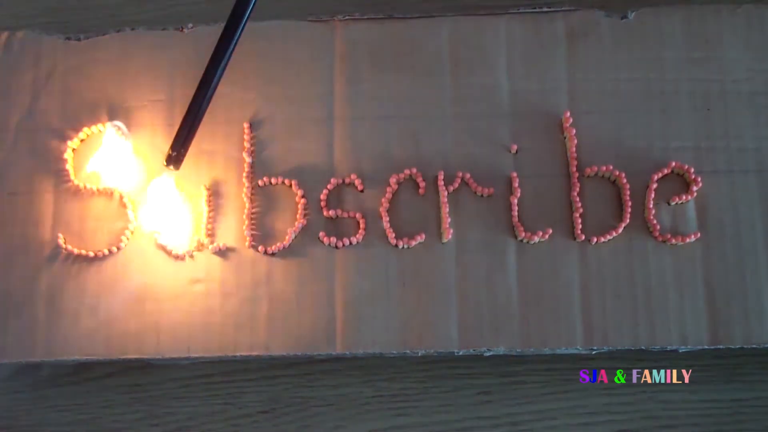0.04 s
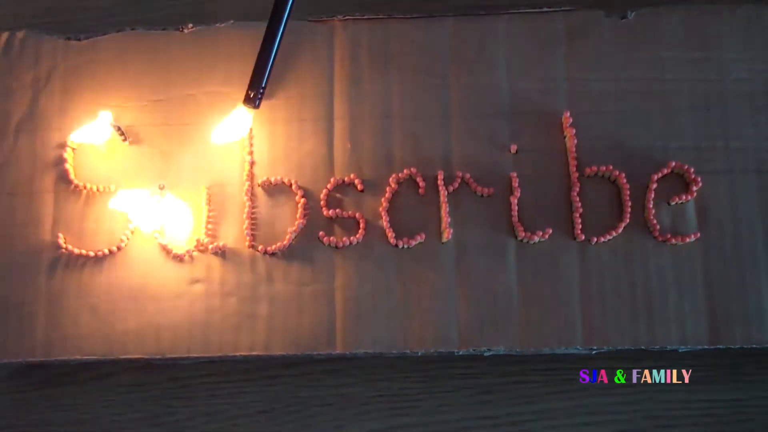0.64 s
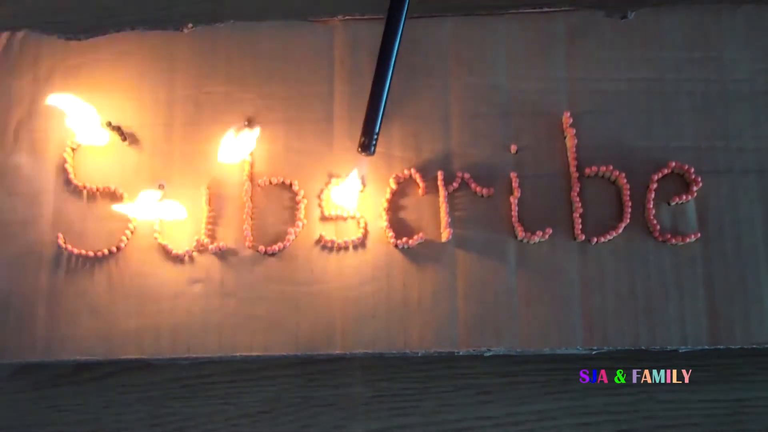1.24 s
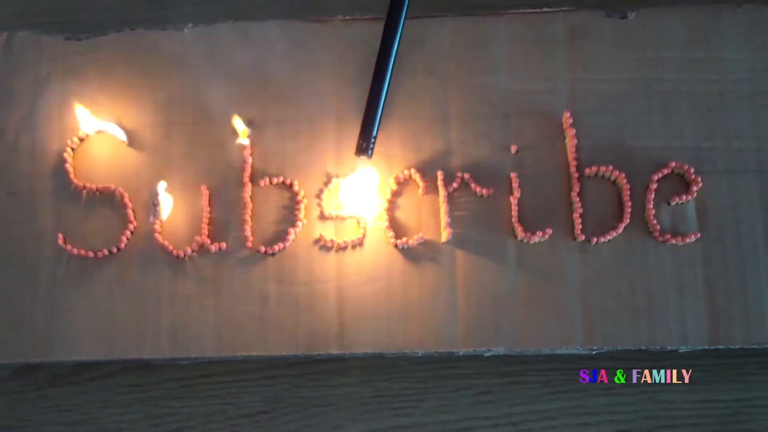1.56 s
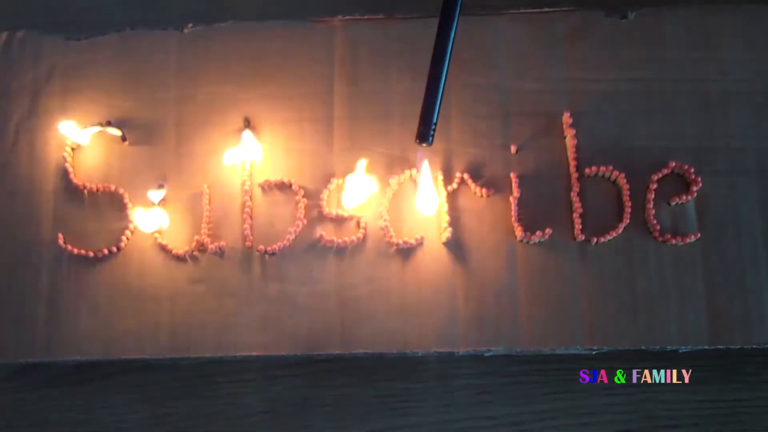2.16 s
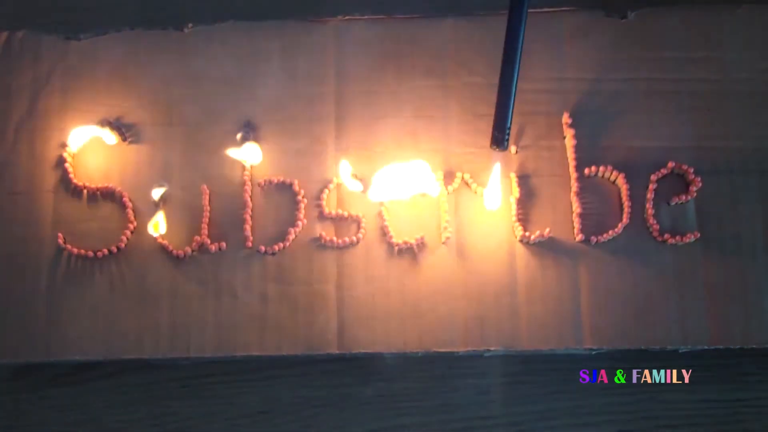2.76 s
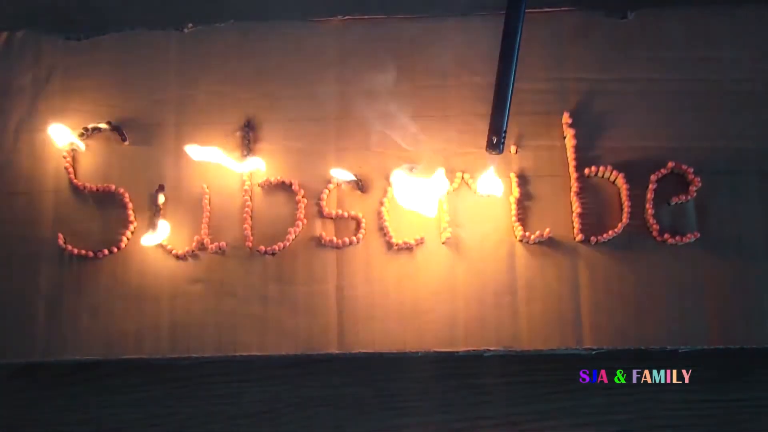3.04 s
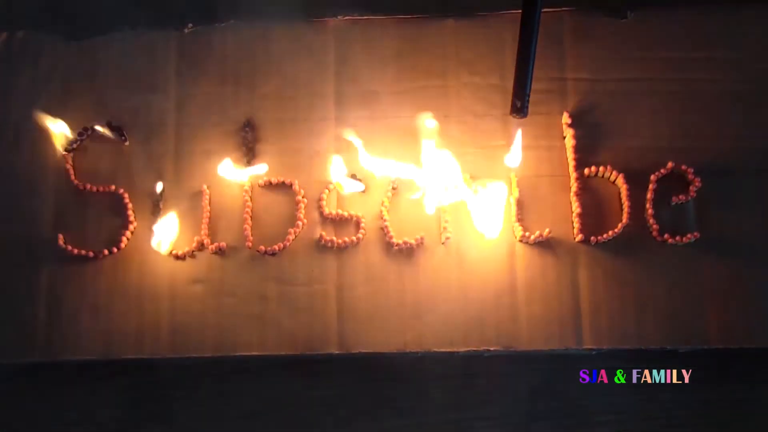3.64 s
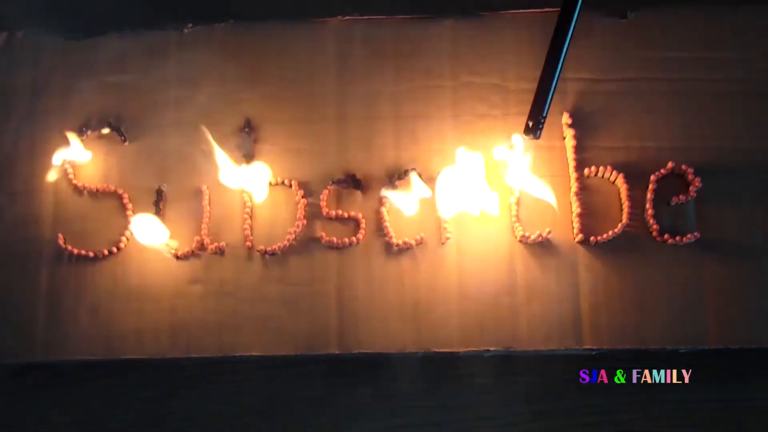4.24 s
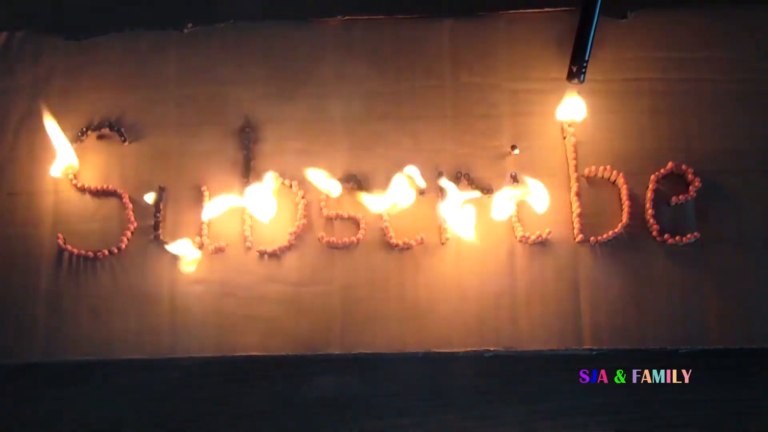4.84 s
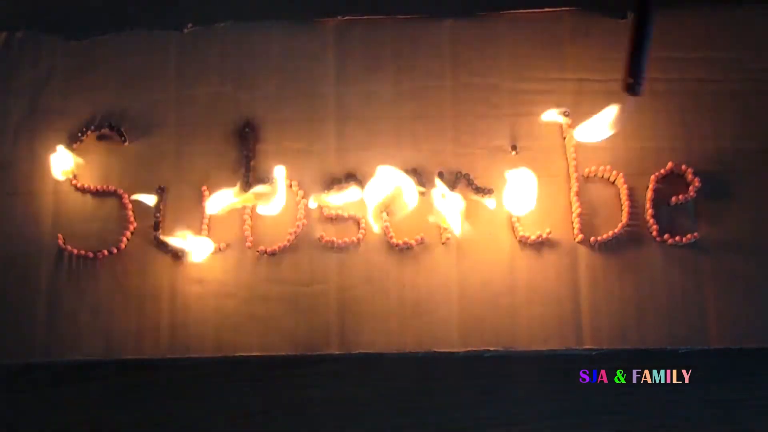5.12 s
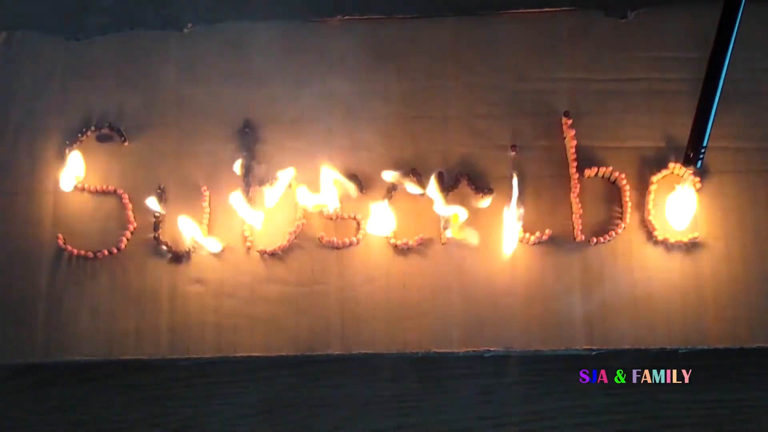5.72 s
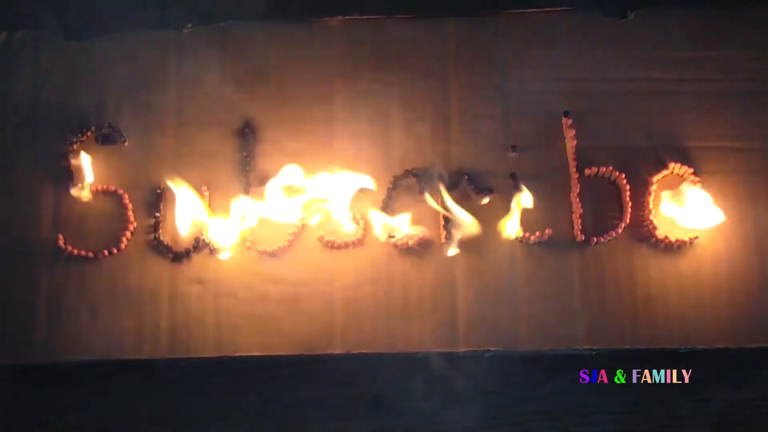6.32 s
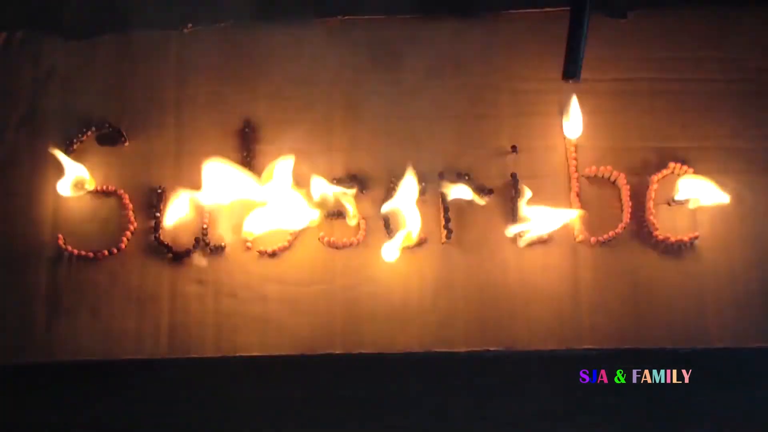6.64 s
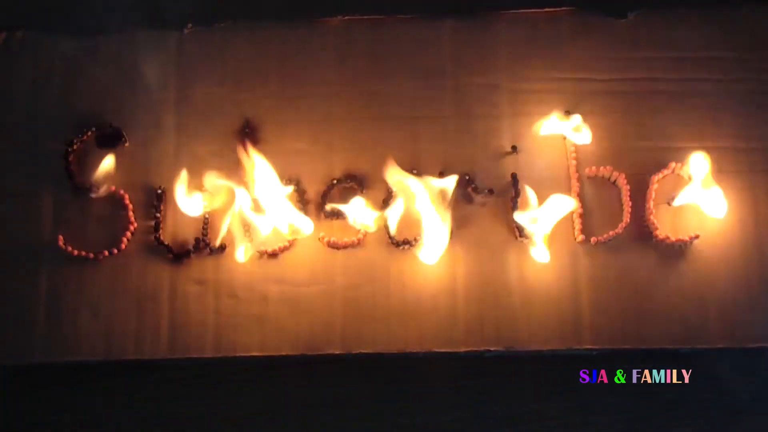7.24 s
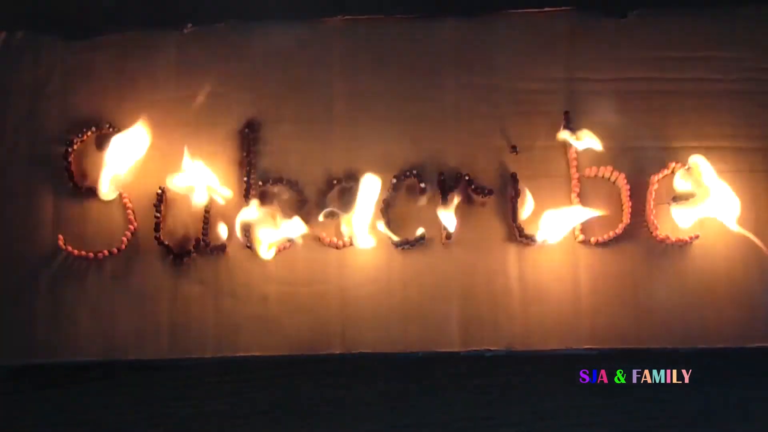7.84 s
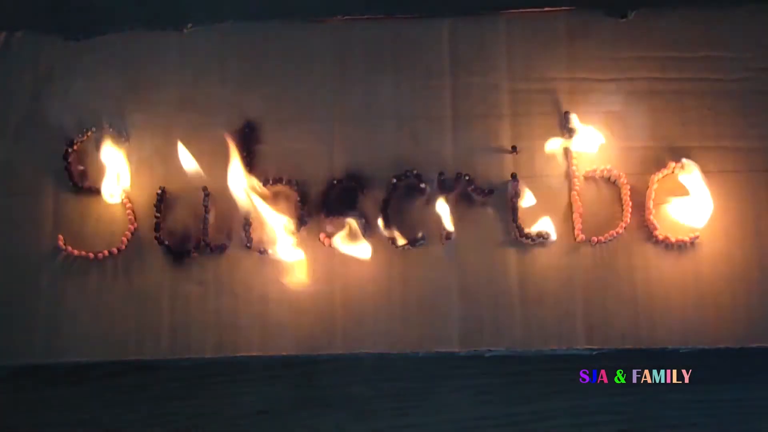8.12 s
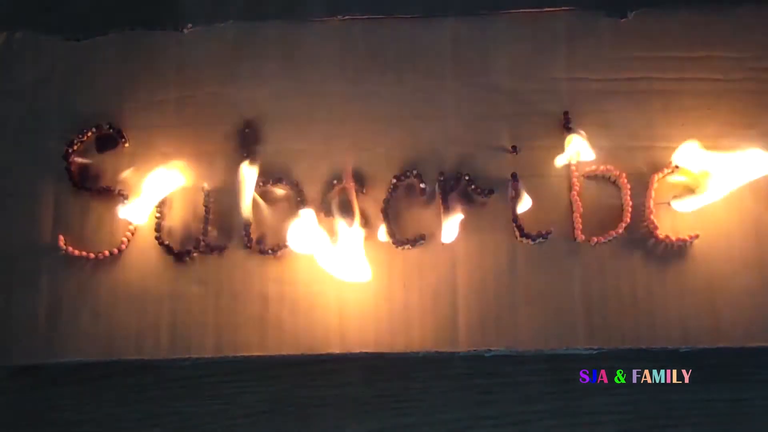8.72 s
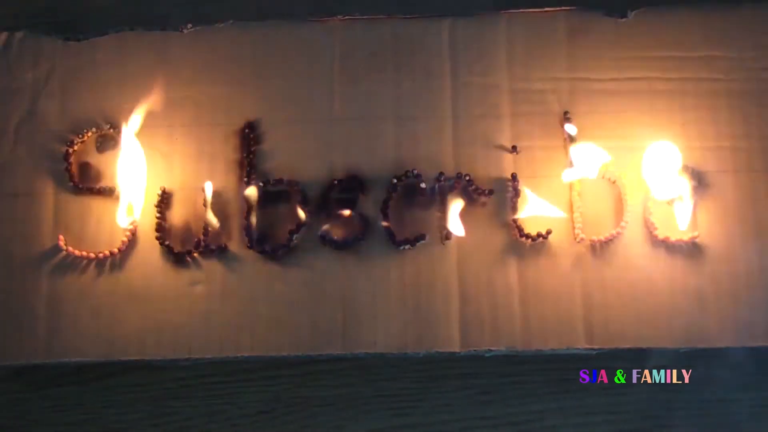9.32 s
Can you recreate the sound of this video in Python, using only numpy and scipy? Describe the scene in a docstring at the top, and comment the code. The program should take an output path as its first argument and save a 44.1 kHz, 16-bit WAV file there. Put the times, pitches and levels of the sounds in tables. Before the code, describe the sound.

Rows of matches catch one after another on cardboard, sizzling and popping close up as a soft flame roar grows.

```python
"""Burning rows of match heads

Match heads catch one after another on a cardboard sheet, heard close up in a small room.
Gas jets and bubbling melt hiss and fizz in surges. Some heads burst with a pop that rings the card,
others spit a bright snap through a split crust. The growing flames roar softly and flap in the draught."""
import sys
import numpy as np
from scipy import signal
from scipy.fft import rfft, irfft
from scipy.io import wavfile
from scipy.ndimage import map_coordinates

SR = 44100
rng = np.random.default_rng(int(sys.argv[2]) if len(sys.argv) > 2 else 0)


def master(y):
    """Save y as 16-bit WAV."""
    cut = np.clip(np.atleast_2d(y).T, -1, 1)
    pcm = np.round(cut * 32767)  # scale
    wavfile.write(sys.argv[1], SR, pcm.astype(np.int16))


N = 422037
TIME_S = np.arange(N) / SR

# Growth of the open flames. Each row: time in seconds, roar level in dB.
ROAR_CURVE = [(0, -72.5), (2.3, -71.5), (2.7, -65), (4.4, -68.5), (5.8, -69.5), (6.5, -59.5), (7.9, -64),
              (9.57, -61.5)]
# Splits in the crust. Each row: start in seconds, level in dB, whistle pitch in Hz, length in ms,
# whistle over crack in dB, top of the crack band in Hz.
CRUST_SPLITS = [(0.3647, -37, 5560, 0.27, 10, 9500), (1.5574, -31, 3930, 1.1, -7, 17000),
                (5.2283, -42.5, 5900, 2.9, -15, 14000), (5.874, -47, 14500, .8, 6, 17200),
                (5.9247, -41, 14000, .6, 4, 17000), (5.9973, -29, 13250, 1.4, -1, 19000),
                (6.5204, -21.5, 6770, .7, 0, 17000), (6.5204, -36.5, 4070, 1.1, 10, 12000),
                (6.5208, -35, 12100, 1, 12, 16100), (7.1554, -39, 12500, 0.65, -1, 16000),
                (7.1992, -30.5, 3950, 2.2, 2, 19300), (7.2002, -41, 6700, 1.9, 6, 15900),
                (7.1995, -25.5, 14800, 1.4, -3, 18800), (8.6142, -35, 13250, .5, -4, 17200),
                (8.7057, -40, 13600, 1.1, -3, 17000), (8.714, -35, 13900, .5, 0, 17000)]


def hiss(bubbles_per_s=700, bubbles_db=-9, spread_db=4.5, surge_db=.5, sputter_db=.39, spit_db=.81):
    """Gas jets and tiny bursting bubbles of melt, following the steady burn and the flares."""
    # Steady burn of the lit heads. Each row: time in seconds, level in dB.
    burn_curve = [(0, -56), (.3, -58.5), (.65, -55.5), (.82, -58), (1.1, -55.5), (1.5, -59.5), (2.1, -57.5),
                  (2.6, -56), (3.15, -56), (3.45, -51.5), (4.1, -53.5), (4.65, -55), (5.5, -56.5),
                  (6.2, -53), (6.76, -54.5), (7.05, -51.5), (7.4, -51.5), (7.72, -50), (8.08, -55.5),
                  (8.35, -56), (8.7, -53), (9.07, -55.5), (9.25, -56.5), (9.45, -54), (9.57, -54.5)]
    # Jet spectrum. Each row: frequency in Hz, density in dB.
    jet_spectrum = [(120, -25), (380, -8.5), (460, -13), (620, -6), (1000, -6), (1550, -7.7), (2000, -10),
                    (2800, -10), (3700, -8.6), (7500, -9.2), (9000, -11.2), (11300, -15.4), (15600, -14.9)]
    flare_power = flares()
    power = gain_of(curve(burn_curve) + surge_db * wander(10)) ** 2 + flare_power
    sizes = gain_of(spread_db * np.minimum(rng.exponential(1, N), 4)) * rng.choice([-1, 1], N)
    bubbles = unit_rms(sizes * (rng.random(N) < bubbles_per_s / SR))
    gas = coloured(rng.standard_normal(N) + gain_of(bubbles_db) * bubbles, jet_spectrum)
    gas = room(card(gas), near_db=-22, near_t60_s=.06, far_db=-13)
    gas /= np.std(band(gas, 1500, 9000))
    gas = close_echoes(burning_spots(gas)) + pinholes()
    jets = jet_balance(gas, flare_power / power)
    flicker_db = sputter_db * wander(29) + spit_db * wander(130)
    return jets * np.sqrt(power) * gain_of(flicker_db)


def flares(attack_s=.018, release_s=.029):
    """Power envelope of heads that catch, blast for a moment and die down."""
    # Ignitions. Each row: start in seconds, level in dB, time until release in seconds.
    ignitions = [(.05, -62, 0.021), (.15, -55.5, 0.098), (.394, -54.5, 0.13), (.853, -56, 0.042),
                 (.925, -55, 0.1), (1.11, -58.5, 0.036), (1.215, -51.5, 0.03), (1.27, -58, 0.015),
                 (1.553, -54.5, 0.053), (1.612, -55.5, 0.086), (1.773, -51, 0.027), (1.943, -51, 0.073),
                 (2.03, -56.5, .11), (2.31, -61, .02), (2.41, -53.5, 0.086), (2.766, -50.5, 0.019),
                 (2.84, -56.5, 0.17), (3.21, -55.5, 0.12), (3.553, -56.5, .128), (3.672, -56, 0.015),
                 (3.75, -59, 0.036), (3.925, -55.5, 0.069), (4.34, -53, 0.083), (4.495, -54, .018),
                 (4.70, -52.5, 0.054), (4.997, -54, 0.12), (5.269, -56.5, 0.025), (5.37, -65, 0.036),
                 (5.485, -57, 0.067), (5.64, -50.5, 0.026), (5.72, -56.5, 0.12), (5.995, -57.5, 0.13),
                 (6.32, -53.5, 0.12), (6.6, -51, 0.027), (6.828, -53.5, 0.069), (6.94, -54.5, 0.13),
                 (7.11, -51.5, 0.022), (7.52, -50.5, 0.027), (7.565, -46.5, 0.019), (7.905, -54, 0.068),
                 (8.118, -55, 0.061), (8.268, -53.5, 0.02), (8.412, -54, 0.039), (8.547, -51.5, 0.02),
                 (8.651, -59, 0.055), (8.75, -57, .02), (8.895, -52.5, 0.019), (9.13, -55.5, 0.043),
                 (9.285, -57, 0.023)]
    power, t = np.zeros(N), np.arange(SR // 2) / SR
    for start_s, db, hold_s in ignitions:
        envelope = np.minimum(t / attack_s, 1) * np.exp(-np.maximum(t - hold_s, 0) / release_s)
        add(power, start_s, (gain_of(db) * envelope) ** 2)
    return power


def jet_balance(gas, flare_share, flare_rush_db=1.5, patchy_db=.92):
    """Four drifting bands of hiss: broad, fresh jets rush low, pinholes fizz high."""
    # Gains of the low rush, the 3 kHz presence and the top fizz. Each row: time in seconds, gain in dB.
    rush_curve = [(0, -2), (1.35, -3.5), (2.3, -1), (3.1, 1), (3.749, 0.5), (4.1, 0.5), (5.6, 2.5),
                  (6.1, 2), (6.95, 2), (7.35, -0.5), (8.4, 0), (8.75, -2.5), (9.57, 0.3)]
    presence_curve = [(0, -0.5), (1.45, -2.5), (2.0, 0.5), (4.5, 1.5), (6.3, 2.5), (7.8, -0.5), (9.57, 1.5)]
    fizz_curve = [(0, -0.5), (.55, 1), (1.45, 0), (1.7, 0.5), (3.4, 0.5), (5.3, 2), (5.95, 3), (6.4, 1.5),
                  (7.3, 4), (8.2, 0.5), (8.9, 2), (9.57, 3)]
    rush = zero_phase(gas, 2200, "low", order=4)
    presence = zero_phase(gas, 4100, "low", order=4) - rush
    fizz = zero_phase(gas, 9500, "high", order=3)
    treble = gas - rush - presence - fizz
    rush_db = curve(rush_curve) + flare_rush_db * flare_share + rush_dips_db()
    bands = [(rush, rush_db), (presence, curve(presence_curve)), (treble, 0), (fizz, curve(fizz_curve))]
    return sum(part * gain_of(db + patchy_db * wander(18)) for part, db in bands)


def rush_dips_db(depth_db=-6, length_s=.018, threshold_db=-29, lead_s=.002):
    """The low rush dips briefly at each loud snap."""
    dips, t = np.zeros(N), np.arange(0, length_s, 1 / SR)
    for start_s, db, *_ in CRUST_SPLITS:
        if db > threshold_db:
            add(dips, start_s - lead_s, np.sin(np.pi * t / length_s) ** .5)
    return depth_db * np.minimum(dips, 1)


def burning_spots(x, fade_s=.13):
    """The hiss changes colour as the fire moves from spot to spot."""
    # Resonances and hollows among the heads.
    # Each row: start and end in seconds, centre and width in Hz, gain in dB.
    spots = [(0, 1.6, 1390, 90, 3), (0, 1.5, 5300, 600, 3), (0, 1.5, 5840, 160, 2), (0, 1.7, 6400, 300, -9),
             (0, 4.5, 7600, 500, -6), (0, 1.6, 3930, 500, -3), (0, 3.1, 7050, 200, 5),
             (1.55, 4.9, 4950, 179, 2), (1.55, 3.6, 9300, 300, -10), (1.551, 4.9, 12080, 328, -9),
             (0, 5, 13130, 300, 3), (0, 4.5, 13950, 400, 3), (6.4, 8.5, 3300, 170, 3),
             (3.2, 6.4, 3480, 200, 1), (3.2, 6, 2520, 200, 3.5), (1.55, 8.1, 1730, 120, 1),
             (5.5, 6.5, 12700, 450, -1), (6.9, 7.2, 14230, 300, 1), (6.9, 9.57, 9900, 700, -1),
             (8.099, 8.2, 1150, 200, -5), (8.1, 11, 1850, 160, -1), (8.1, 11, 2370, 300, 4.5),
             (8.1, 11, 3070, 250, -5), (8.1, 11, 4430, 100, 4), (8.55, 11, 5360, 130, 1)]
    out = x.copy()
    for start_s, end_s, hz, width_hz, db in spots:
        alight = np.clip(np.minimum(TIME_S - start_s, end_s - TIME_S) / fade_s + .5, 0, 1)
        out += (gain_of(db) - 1) * alight * resonance(x, hz, width_hz)
    return out


def pinholes(level_db=-15, per_s=22, lo_hz=3300, hi_hz=9500, width_hz=130, length_s=.032, glide=.0243):
    """Pinholes open in the melt and whistle breathily, sliding in pitch."""
    out, t = np.zeros(N), np.arange(SR // 6) / SR
    chance, place, slide, size = rng.random((4, N))
    breath = signal.lfilter([1], [1, -np.exp(-np.pi * width_hz / SR)], rng.standard_normal(N + len(t)))
    swell = t / length_s * np.exp(-2 * t / length_s)
    for i in np.flatnonzero(chance < per_s / SR):
        start_hz = lo_hz * (hi_hz / lo_hz) ** place[i]
        hz = start_hz * (1 + glide * (slide[i] - .5) * t / length_s)
        whistle = breath[i:i + len(t)] * np.sin(2 * np.pi * np.cumsum(hz) / SR)
        add(out, TIME_S[i], (.5 + size[i]) * swell * whistle)
    return gain_of(level_db) * unit_rms(out)


def sizzles(q=3.8):
    """Brief bands of noise: high sizzles, low breathy tones and one pop's low body."""
    # Noise swells. Each row: middle in seconds, level in dB, centre in Hz, length in seconds.
    swells = [(3.685, -41.5, 640, 0.02), (3.784, -51.5, 8400, .035), (3.854, -52, 9700, 0.028),
              (3.922, -54, 9800, .015), (3.979, -56, 9900, 0.035), (5.407, -52, 494, 0.04),
              (6.226, -48.5, 540, 0.033), (8.62, -56, 14400, .014), (8.662, -46, 13700, 0.029),
              (8.655, -54.5, 13550, 0.29), (8.708, -44, 14000, 0.017)]
    out, t = np.zeros(N), np.arange(-SR // 3, SR // 3) / SR
    for middle_s, db, hz, length_s in swells:
        noise = unit_rms(resonance(rng.standard_normal(len(t)), hz, hz / q))
        add(out, middle_s + t[0], gain_of(db) * noise * np.exp(-(2 * t / length_s) ** 2))
    return out


def pops(crumble_db=-17, crumble_s=.0009, shards=4, shard_db=-10, puff_db=-22, puff_s=.0021):
    """A head bursts on the card: a blast wave, crumbling crust, a gas puff, lesser blasts as it breaks."""
    # Bursting heads. Each row: start in seconds, level in dB, pulse pitch in Hz, break-up time in ms.
    bursts = [(0.9428, -35, 5500, 2.5), (1.1716, -36, 4500, .2), (1.2256, -31, 2390, 0.71),
              (1.3273, -38.5, 4500, 0.22), (1.5572, -22, 3600, 0.38), (1.5574, -30.5, 800, 1.17),
              (1.5626, -28, 3800, 0.27), (1.632, -34, 2800, 0.48), (1.6396, -30, 4200, 1.4),
              (1.7628, -34.5, 2400, 0.2), (2.1466, -33, 4500, .4), (2.3236, -33, 3200, .3),
              (2.4183, -21.5, 5000, 0.44), (2.4243, -26, 4000, 0.25), (3.362, -27.5, 3500, 2),
              (3.5897, -32, 1500, 0.85), (3.6792, -29, 560, 0.74), (3.6782, -26, 4000, 0.37),
              (3.9093, -35, 1490, .3), (3.9335, -29.5, 3000, 0.54), (3.9403, -30.5, 2200, 1.3),
              (4.3605, -30, 4000, 0.45), (4.4998, -20, 2200, 0.28), (4.7514, -14, 2310, 0.23),
              (4.7516, -35, 754, 0.25), (5.6582, -31, 2280, 0.58), (5.9037, -30.5, 4000, .3),
              (6.0307, -30, 2200, 0.35), (6.1855, -30, 2000, 1.4), (6.299, -29, 4000, .3),
              (6.345, -33.5, 1400, 0.7), (6.4105, -33, 1100, 1.1), (6.6153, -28.5, 1010, 0.47),
              (6.6157, -26, 3980, 0.3), (6.6818, -22, 4500, 0.25), (6.683, -29.5, 990, 0.99),
              (6.8906, -30.5, 950, .3), (6.9388, -27, 694, 0.5), (6.9424, -34, 900, 3),
              (7.1293, -32, 3800, 0.54), (7.2207, -32.5, 1090, .3), (7.5738, -30, 1980, 1.3),
              (7.5887, -29.5, 4050, .5), (8.044, -31, 4500, 0.34), (8.1266, -36, 1597, 0.49),
              (8.3934, -30, 3800, .6), (8.7335, -32.5, 2800, 0.62), (8.9494, -32, 3200, .5),
              (9.2975, -32, 4200, 0.35), (9.3535, -32, 4470, .3)]
    out, t = np.zeros(N), np.arange(SR // 40) / SR
    noises = rng.standard_normal((len(bursts), 2, len(t)))
    lags = rng.random((len(bursts), shards))
    for (start_s, db, hz, breakup_ms), (grit, gas), lag in zip(bursts, noises, lags):
        u = 2 * np.pi * np.sqrt(2) * hz * t
        blast = u * (u - 2) * np.exp(-u)  # steep swing, slower return
        size = (2500 / hz) ** .56  # a big, low burst sheds more crust and gas
        crumble = gain_of(crumble_db) * size * grit * np.exp(-t / crumble_s)
        burst = gain_of(db) * (blast / abs(blast).max() + crumble)
        puff = band(gas, 350, 3800, order=1) * t / puff_s * np.exp(1 - t / puff_s)
        add(out, start_s, burst + gain_of(db + puff_db) * size * puff)
        shard = burst * gain_of(shard_db) * np.tanh(breakup_ms)
        for k in range(shards):
            add(out, start_s + breakup_ms / 1000 * (k + .5 + lag[k]) / shards, shard)
    out = band(band(out, 190, 17000, order=1), 60, 10500)
    return room(card(out), near_db=-9, near_t60_s=.06, far_db=-15)


def snaps(ring=.75, sag=.047, low_hz=2900):
    """A spurt of gas cracks and whistles through split crust, its pitch sagging with the pressure."""
    out, t = np.zeros(N), np.arange(SR // 100) / SR
    for start_s, db, hz, length_ms, whistle_db, top_hz in CRUST_SPLITS:
        u = t * 1000 / length_ms
        crack = band(rng.standard_normal(len(t)) * u * np.exp(-3 * u), low_hz, top_hz, order=4)
        cycles = np.cumsum(hz * (1 + sag * (np.exp(-2 * u) - .5))) / SR
        whistle = np.sin(2 * np.pi * cycles) * u * np.exp(-np.pi * u / ring)
        snap = unit_rms(crack) + gain_of(whistle_db) * unit_rms(whistle)
        add(out, start_s, gain_of(db) * unit_rms(snap) / np.sqrt(u[-1]))  # level over the spurt's length
    return room(out, near_db=-9.5, near_t60_s=.14, far_db=-13)


def flaps(rebounds=3, rebound_s=.01127, rebound_db=-16.5, flutters_per_s=16, flutter_hz=154, tatter_db=-16):
    """A gas pocket burns at once: a low, ragged pressure swing, then weaker ones as the flame closes."""
    # Flames tearing off. Each row: middle in seconds, level in dB, pitch in Hz, half length in cycles.
    tears = [(2.909, -49, 144, 0.49), (3.695, -42.5, 233, 0.88), (4.1229, -38, 256, 1),
             (4.154, -44, 125, .45), (4.174, -43, 105, 0.61), (4.206, -33, 135, 0.36),
             (4.987, -40, 152, 0.46), (5.074, -34, 175, 0.3), (5.131, -44, 120, 0.28),
             (5.3159, -38, 207, 0.38), (5.342, -39.5, 124, 0.51), (5.357, -43, 115, 0.51),
             (5.38, -31, 180, 0.37), (5.3914, -35.5, 306, 0.74), (5.398, -30, 180, 0.5),
             (5.464, -34, 165, 0.38), (6.538, -43.5, 236, 0.46), (6.6477, -32.5, 213, 0.36),
             (6.7188, -33.5, 175, 0.36), (6.7249, -36.5, 170, 0.5), (7.086, -42, 129, 0.84),
             (7.0936, -36, 135, 0.53), (7.167, -41, 170, 0.55), (7.748, -46.5, 130, 0.4),
             (8.133, -44.5, 210, 1), (8.261, -54, 120, 0.28), (8.339, -47, 130, .45),
             (8.8452, -42, 125, 0.38), (8.858, -43, 120, .45), (8.943, -45, 158, .45),
             (9.396, -43, 115, 0.65), (9.411, -42, 95, 0.43), (9.456, -42, 100, 0.38),
             (9.525, -38, 110, 0.68)]
    out, t = np.zeros(N), np.arange(-SR // 50, SR // 50) / SR
    edge, size, pitch = rng.standard_normal((3, N))
    gaps = rng.uniform(.5, 1.5, (N, rebounds))
    # Lesser flaps come at random and grow with the roar.
    flutter_db = curve(ROAR_CURVE) + 3 + 7.5 * size
    flutter_at = np.flatnonzero((rng.random(N) < flutters_per_s / SR) & (TIME_S > -t[0]))
    flutters = [(TIME_S[i], flutter_db[i], flutter_hz * 2 ** (.38 * pitch[i]), .32) for i in flutter_at]
    for (middle_s, db, hz, cycles), gap in zip(tears + flutters, gaps):
        swing = gain_of(db) * np.sin(2 * np.pi * hz * t) * np.exp(-(hz * t / cycles) ** 2)
        add(out, middle_s + t[0], swing)
        for k, delay_s in enumerate(rebound_s * np.cumsum(gap)):
            add(out, middle_s + t[0] + delay_s, swing * gain_of(rebound_db) / (k + 1))
    tatters = abs(signal.hilbert(out)) * unit_rms(band(edge, 186, 550))
    return band(out, 35, 1100, order=1) + gain_of(tatter_db) * tatters


def roar(trim_db=-2.5, lump_db=3.5, gust_squareness=3.2):
    """Turbulent flames rumble in rolling lumps, growing slowly and swelling at each gust."""
    # Flame spectrum. Each row: frequency in Hz, density in dB.
    flame_spectrum = [(10, -26), (25, -3), (60, 2.5), (125, 2), (170, 1), (235, 3), (300, -10), (420, -10),
                      (800, -70), (3000, -70)]
    # Draughts on the flames. Each row: middle in seconds, level in dB, half length in seconds.
    gusts = [(2.917, -61, 0.017), (3.094, -59, 0.031), (3.685, -75, 0.024), (4.16, -49, 0.05),
             (5.044, -50, 0.093), (5.39, -51.5, 0.11), (6.693, -52, 0.057), (7.11, -49, 0.052),
             (7.646, -55, 0.057), (8.142, -57.5, 0.014), (8.28, -65, 0.058), (8.87, -53, 0.029),
             (9.145, -58, 0.064), (9.407, -48, 0.032), (9.53, -42.5, 0.012)]
    lumps = coloured(rng.standard_normal(N), flame_spectrum) * gain_of(lump_db * np.tanh(wander(12)))
    strength = gain_of(curve(ROAR_CURVE))
    for middle_s, db, half_s in gusts:
        t = np.arange(-2 * half_s, 2 * half_s, 1 / SR)
        add(strength, middle_s + t[0], gain_of(db) * np.exp(-abs(t / half_s) ** gust_squareness))
    return unit_rms(lumps) * strength * gain_of(trim_db)


def card(x, hollow_hz=2350, hollow_width_hz=900, absorbed=.61):
    """The card rings at its resonances and absorbs one broad band."""
    # Modes of the card and the air over the table. Each row: centre and width in Hz, gain in dB.
    modes = [(426, 23, 2.5), (532, 30, 8.5), (735, 65, 7), (838, 39, 7.5), (944, 32.5, 9.5), (1136, 23, 4),
             (1408, 306, 7), (1630, 69, -2), (1719, 79, 8.5), (1861, 79, 9.5), (2144, 82, 10),
             (2310, 73, 10.5), (2474, 190, 6.5), (2960, 100, 3.5), (3136, 76, 6), (3320, 39, 5),
             (3620, 36, 8.5), (3890, 42, 3), (3984, 130, 4), (4314, 31, 7.5), (4600, 120, 2.5),
             (4920, 130, 3), (5140, 130, 2.5), (5330, 75, 4), (5800, 39, 4), (6200, 22, 8),
             (6390, 910, 2.5), (7220, 44, 2.5), (7680, 100, 5.5)]
    out = x.copy()
    for hz, width_hz, db in modes:
        out += (gain_of(db) - 1) * resonance(x, hz, width_hz)
    return out - absorbed * resonance(out, hollow_hz, hollow_width_hz)


def close_echoes(x, drift=.043, drift_hz=.37):
    """Close echoes comb the hiss; the comb slides as the flames move."""
    # Echoes off the card and the table edge. Each row: delay in ms, signed gain.
    bounces = [(.78, -.09), (1.0, .09), (2.25, .07), (2.58, -.07)]
    out = x.copy()
    for delay_ms, gain in bounces:
        delay_samples = delay_ms / 1000 * SR * (1 + drift * wander(drift_hz))
        out += gain * map_coordinates(x, [np.arange(N) - delay_samples], order=3)
    return out


def room(x, near_db, near_t60_s, far_db):
    """Direct sound, quick reflections from the table and the room's faint tail."""
    # Room decay. Each row: frequency in Hz, T60 in seconds.
    decay = [(200, .3), (1000, .28), (6000, .24), (14000, .11)]
    t = np.arange(SR // 2) / SR
    near = rng.standard_normal(len(t)) * gain_of(-60 * t / near_t60_s) * (t > .0008)
    near = band(near, 180, 12000, order=1)
    hz, frame_s, frames = signal.stft(rng.standard_normal(len(t)), SR, nperseg=256)
    frames *= gain_of(-60 * frame_s / at_hz(decay, hz)[:, None])
    far = signal.istft(frames, SR, nperseg=256)[1][:len(t)] * (t > .006)
    echoes = gain_of(near_db) * near / np.linalg.norm(near) + gain_of(far_db) * far / np.linalg.norm(far)
    return x + signal.fftconvolve(x, echoes)[:N]


def rumble(level_db=-68):
    """Faint, steady low rumble with a hum near 230 Hz."""
    # Rumble and hum spectrum. Each row: frequency in Hz, density in dB.
    rumble_spectrum = [(15, 1.5), (40, 7), (90, -16), (150, -9), (205, 10), (255, 11), (320, -2), (410, 3),
                       (700, -6), (2000, -48), (12000, -32)]
    return gain_of(level_db) * unit_rms(coloured(rng.standard_normal(N), rumble_spectrum))


def gain_of(db):
    """Decibels to amplitude."""
    return 10 ** (np.asarray(db) / 20)


def unit_rms(x):
    """Scales to rms 1."""
    return x / np.sqrt(np.mean(x ** 2) + 1e-20)


def at_hz(points, hz):
    """Interpolates a table on a log-frequency axis."""
    points_hz, values = np.transpose(points)
    return np.interp(np.log(hz + 1), np.log(points_hz + 1), values)


def curve(points):
    """Interpolates a time table at every sample."""
    return np.interp(TIME_S, *np.transpose(points))


def add(mix, start_s, sound):
    """Mixes a sound in, in place."""
    part = mix[round(start_s * SR):][:len(sound)]
    part += sound[:len(part)]


def band(x, lo_hz, hi_hz, order=2):
    """Causal band-pass."""
    return signal.sosfilt(signal.butter(order, [lo_hz, hi_hz], "band", fs=SR, output="sos"), x)


def zero_phase(x, hz, kind, order):
    """Low- or high-pass, run forward and back."""
    return signal.sosfiltfilt(signal.butter(order, hz, kind, fs=SR, output="sos"), x)


def resonance(x, hz, width_hz):
    """The part of a sound within one resonance."""
    return signal.lfilter(*signal.iirpeak(hz, hz / width_hz, fs=SR), x)


def coloured(x, spectrum):
    """Shapes a steady sound by a spectrum table."""
    return irfft(rfft(x) * gain_of(at_hz(spectrum, np.fft.rfftfreq(N, 1 / SR))), N)


def wander(rate_hz):
    """Random drift of rms 1, up to about the given rate."""
    hz = np.fft.rfftfreq(N, 1 / SR)
    return unit_rms(irfft(rfft(rng.standard_normal(N)) / (1 + (hz / rate_hz) ** 2), N))


def scene():
    """The fire over a faint rumble, alike in both channels."""
    mix = rumble() + hiss() + sizzles() + roar() + flaps() + pops() + snaps()
    return np.array([mix, mix])


def record(dry):
    """Steep low-pass at 15.9 kHz."""
    taps = signal.firwin(401, 15900, window=("kaiser", 8), fs=SR)
    return signal.oaconvolve(dry, taps[None], "same")


dry = scene()
out = record(dry)
master(out)
```